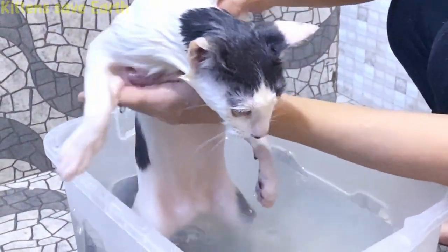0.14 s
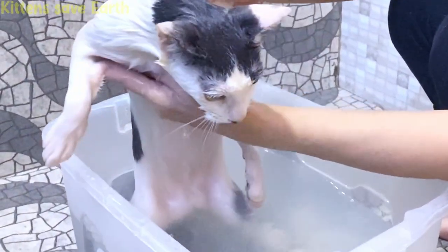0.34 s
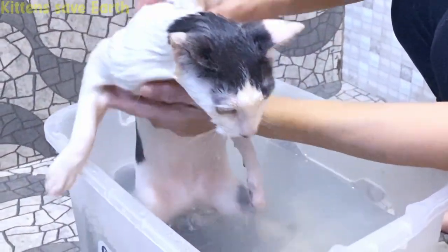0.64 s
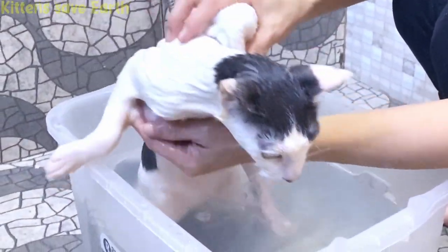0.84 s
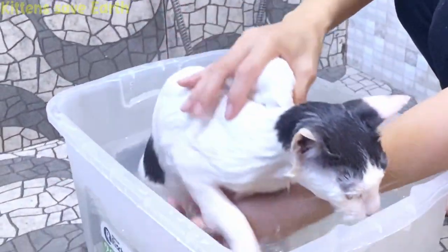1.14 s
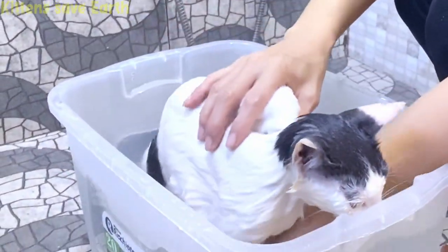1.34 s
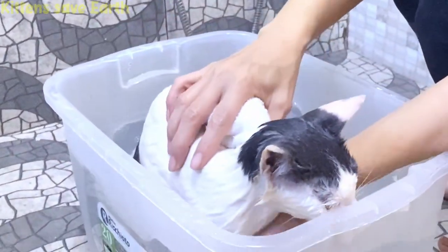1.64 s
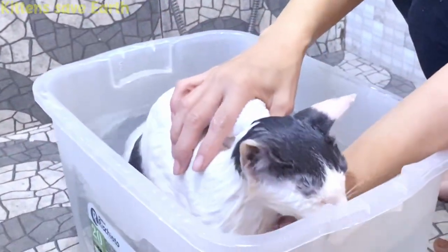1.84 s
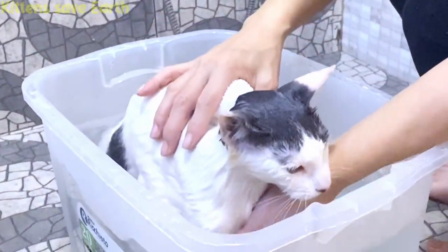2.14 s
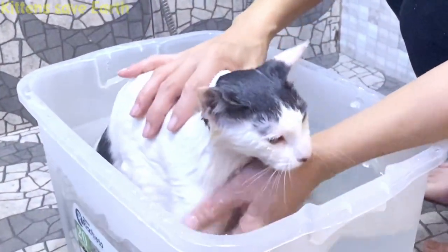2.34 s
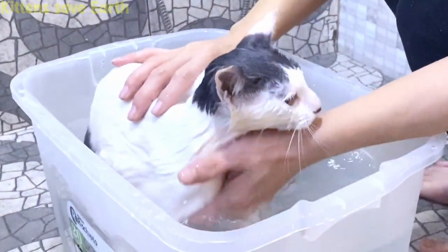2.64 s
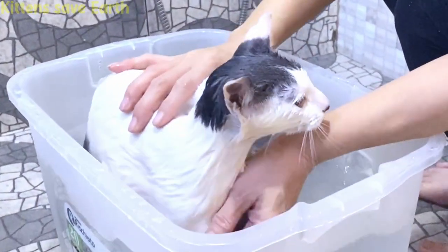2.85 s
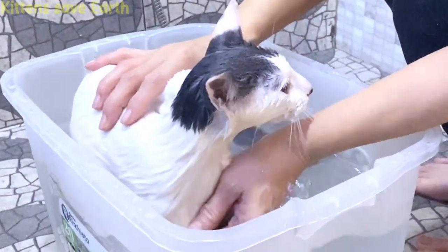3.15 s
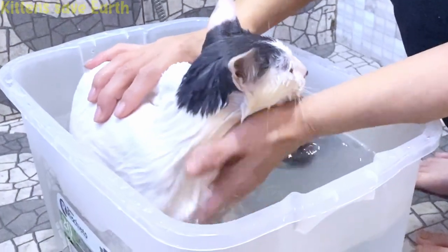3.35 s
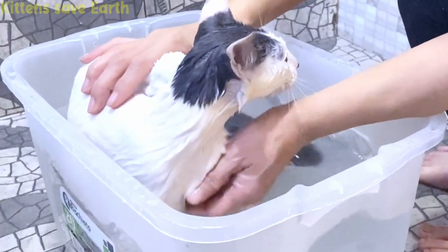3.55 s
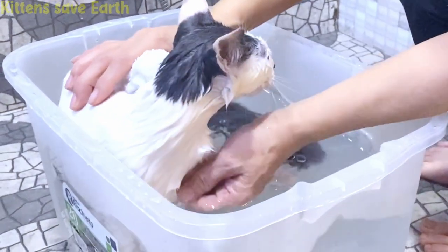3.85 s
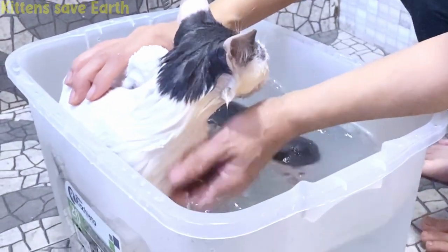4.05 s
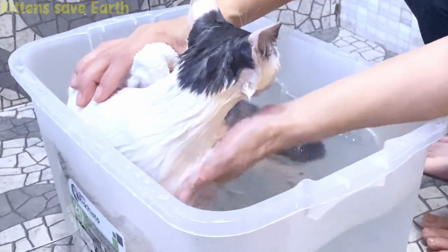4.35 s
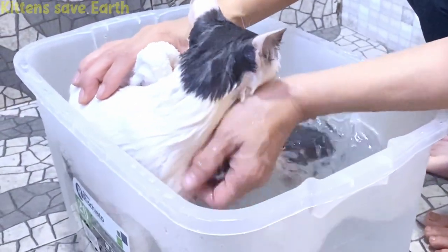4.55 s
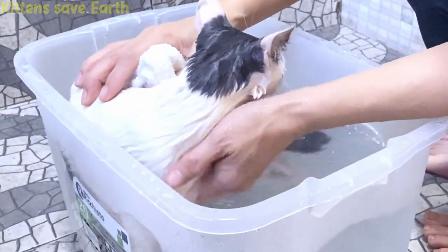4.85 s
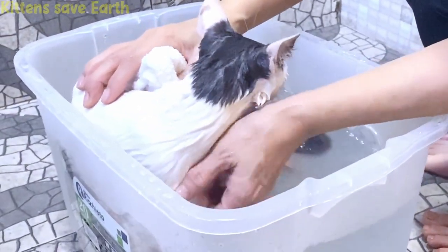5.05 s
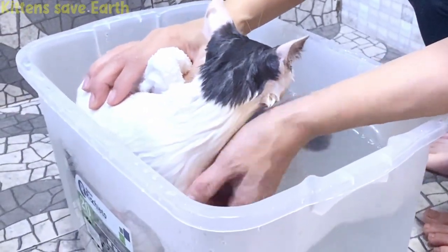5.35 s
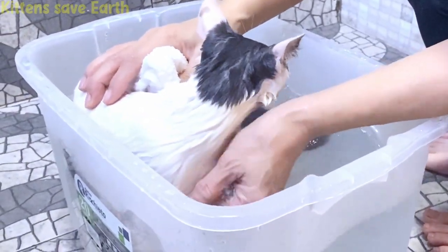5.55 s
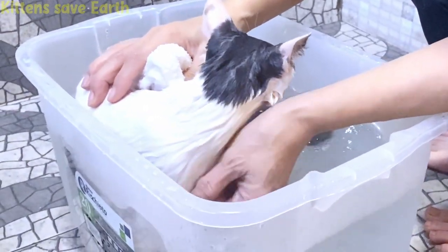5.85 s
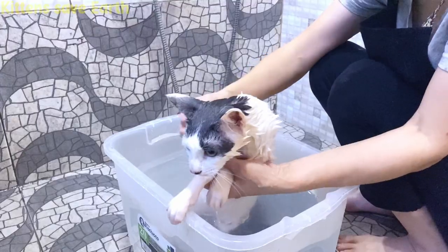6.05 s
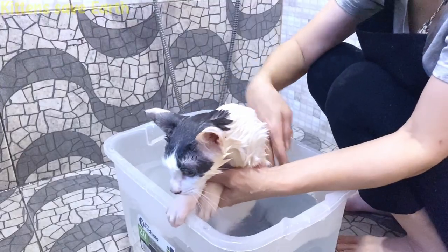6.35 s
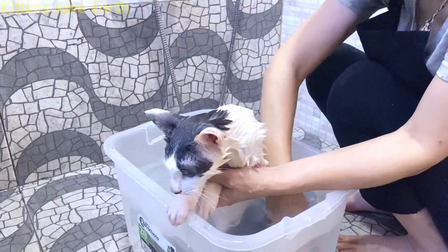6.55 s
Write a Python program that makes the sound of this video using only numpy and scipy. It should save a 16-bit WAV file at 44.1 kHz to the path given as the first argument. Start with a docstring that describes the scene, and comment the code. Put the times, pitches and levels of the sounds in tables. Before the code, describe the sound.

Water sloshes, fizzes and slaps in a plastic tub as hands wash a wet cat; hard tiles ring, then an abrupt cut to near quiet.

```python
"""Drips plink into a plastic tub of water, then a cat is lowered in and washed by hand in a small tiled room.
Each stroke of the hand frees swarms of bubbles that fizz and gurgle, and shoves the tub's rumbling walls.
Scooped water slaps the surface as bursts of noise, spray spatters in tiny ticks, wet films crackle.
A stereo pair hears it with the ring of the hard walls, over a faint steady hush. Near the end the sound
cuts abruptly, echoes included, to a later moment with a few drips and a hand dipping in."""
import sys
import numpy as np
from scipy import signal
from scipy.fft import rfft, irfft, next_fast_len
from scipy.io import wavfile
from scipy.ndimage import uniform_filter1d

SR = 44100
rng = np.random.default_rng(int(sys.argv[2]) if len(sys.argv) > 2 else 0)


def file_out(sig):
    """Save sig as 16-bit WAV at sys.argv[1]."""
    # one column per channel
    cols = np.atleast_2d(sig).T
    # limit, then scale
    lim = np.clip(cols, -1, 1)
    pcm = np.round(lim * 32767).astype(np.int16)
    wavfile.write(sys.argv[1], SR, pcm)


N = 295205

# Strokes of the hand or the cat through the water. Each row: start in seconds, length in seconds,
# fizz pitch in Hz, fizz level in dB, gurgle pitch in Hz, gurgle level in dB, tub wall level in dB.
HAND_STROKES = [(1.294, 0.27, 2792, -38, 848, -37.5, -47.5), (1.554, 0.18, 3960, -41, 1584, -42.5, -54),
                (1.776, 0.23, 2725, -49.5, 1047, -49, -96), (2.015, 0.062, 3250, -46.5, 1020, -51, -89),
                (2.6, 0.06, 4000, -48, 720, -63.5, -90), (3.009, 0.07, 4170, -58, 1497, -53, -49.5),
                (3.281, 0.12, 1487, -35, 823, -47.5, -62), (3.648, 0.32, 3664, -72, 1328, -69, -78),
                (4.276, 0.14, 2426, -41.5, 897, -44.5, -51.5), (4.387, 0.2, 4760, -45.5, 1491, -52.5, -67),
                (4.564, 0.069, 2720, -33.5, 1640, -50, -60), (4.792, 0.14, 2190, -37.5, 682, -36, -49),
                (4.927, 0.26, 1908, -52, 885, -51.5, -71.5), (5.137, 0.12, 2624, -36.5, 880, -33.5, -52.5),
                (5.289, 0.28, 1958, -42, 644, -49, -58.5), (5.467, 0.16, 3740, -45.5, 710, -44, -54),
                (5.678, 0.1, 2283, -43, 1223, -45.5, -87), (5.754, 0.083, 4440, -49, 748, -43, -51),
                (6.558, 0.15, 2170, -63, 613, -56.5, -51.5)]
# The clearest air pockets trapped by the hand and the cat.
# Each row: start in seconds, pitch in Hz, level in dB, swell in seconds.
AIR_POCKETS = [(1.279, 3206, -25, .0018), (1.289, 1365, -30, 0.0061), (1.312, 1040, -31.5, 0.0049),
               (1.32, 3480, -28.5, 0.004), (1.355, 936, -20, 0.0018), (1.454, 2430, -22, 0.0017),
               (1.573, 2138, -26, 0.0033), (1.668, 1470, -35, 0.0015), (1.802, 1530, -34, 0.0056),
               (1.842, 833, -36, 0.0065), (1.861, 1475, -29.5, 0.0016), (1.88, 798, -33.5, 0.0057),
               (2.029, 2264, -28.5, 0.0021), (2.054, 2173, -30.5, 0.0033), (2.21, 783, -30.5, 0.0044),
               (2.226, 1264, -29, 0.00091), (2.607, 3340, -28, 0.0011), (3.013, 2188, -14, 0.0018),
               (3.019, 4010, -30, 0.0022), (3.288, 1458, -19, 0.0041), (3.312, 1586, -16, 0.0019),
               (3.33, 1103, -23, 0.0022), (4.251, 1470, -39, 0.0027), (4.261, 3000, -28, 0.00091),
               (4.28, 1505, -23, 0.0014), (4.284, 574, -28.5, 0.0065), (4.382, 715, -27, 0.0033),
               (4.576, 1970, -14.5, 0.0029), (4.789, 1086, -26, 0.0047), (4.83, 800, -22.5, 0.0034),
               (5.11, 2480, -18.5, 0.0012), (5.141, 1015, -18.5, 0.0033), (5.186, 1100, -22.5, .0018),
               (5.205, 806, -28, 0.0025), (5.317, 2360, -25, 0.0012), (5.419, 1500, -22.5, 0.00099),
               (5.738, 2585, -25.5, 0.0015), (5.787, 1005, -28, 0.002), (5.893, 614, -29.5, 0.0027),
               (5.937, 627, -40, 0.0024)]
# Drops falling from the wet fur and hands. Each row: start in seconds, pitch in Hz, level in dB.
FALLING_DRIPS = [(0.044, 2390, -52.5), (0.166, 3455, -41), (0.21, 5100, -50.5), (0.649, 1910, -45),
                 (0.662, 2000, -40.5), (0.922, 2685, -44.5), (0.927, 1270, -52.5), (0.992, 1743, -32.5),
                 (2.402, 6510, -41.5), (2.968, 2240, -35.5), (3.016, 5220, -38), (3.456, 5260, -34),
                 (3.56, 4060, -49.5), (3.66, 1304, -42), (3.735, 1385, -44), (3.817, 4110, -52),
                 (3.948, 1520, -45), (4.08, 1977, -42), (4.117, 4940, -48.5), (6.061, 3870, -50),
                 (6.222, 2116, -47.5), (6.252, 2600, -53.5), (6.362, 5380, -55.5)]
# Water slapping the surface, the fur or the tub wall.
# Each row: start in seconds, level in dB, centre frequency in Hz.
WATER_SLAPS = [(0.478, -66, 690), (0.646, -57.5, 3400.0), (1.273, -33, 3150), (1.886, -30.5, 2800),
               (2.054, -33.5, 3270), (2.229, -33.5, 3400), (2.605, -32, 3860), (3.014, -29, 2024),
               (3.287, -28.5, 1705), (3.312, -23.5, 3670), (4.278, -24, 2457), (4.377, -21.5, 5090),
               (4.574, -22.5, 5400), (4.787, -19, 2283), (5.317, -27.5, 2410), (6.534, -49, 5190)]
# Spray pattering on the water and the tub's rim.
# Each row: start in seconds, length in seconds, pitch in Hz, level in dB.
SPRAY_SPATTERS = [(1.118, .24, 5200, -57), (1.304, 0.18, 8940, -55.5), (1.573, .14, 8470, -50.5),
                  (2.601, 0.049, 7480, -43), (4.038, .2, 8020, -58), (5.136, .2, 4820, -53.5),
                  (5.43, 0.13, 8300, -54), (5.748, .06, 6370, -45.5)]
# Spectrum of the plastic walls' rumble. Each row: frequency in Hz, relative density in dB per Hz.
TUB_SPECTRUM = [(30, -24), (90, -3.5), (170, 1), (330, -2.5), (1200, -48.5)]
# How long the tiled room rings. Each row: frequency in Hz, time to fall by 60 dB in seconds.
TILE_RING = [(600, 0.64), (4000, 0.62), (9000, 0.48), (15000, 0.08)]
# Standing waves between the hard walls. One column: frequency in Hz.
STANDING_WAVES_HZ = [317, 525, 940, 1020, 1504, 1554]
# Response of the microphones to the water. Each row: frequency in Hz, gain in dB.
MICROPHONE_RESPONSE = [(50, -29), (300, -10.5), (600, -1.9), (6800, -4), (8400, -9.5), (10500, -4.5),
                       (13000, -9), (15000, -3)]
# Spectrum of the quiet room. Each row: frequency in Hz, relative density in dB per Hz.
AIR_SPECTRUM = [(30, -23), (65, -8), (330, -7.5), (700, -16), (2500, -23.5), (15000, -43.5)]

CUT_S, TOP_HZ = 5.968, 15750  # the cut to a later moment; upper band limit
SPOTS = 5  # places in the tub, each with its own paths to the microphones

# how far the strongest bubbles of a swarm stand out, and the foam around them
FIZZ_WIDTH_OCT, FIZZ_SPREAD_DB, FIZZ_FOAM_DB = 0.8, 19, -16
GURGLE_WIDTH_OCT, GURGLE_SPREAD_DB, GURGLE_FOAM_DB = 0.52, 13, -18
SPATTER_WIDTH_OCT, SPATTER_SPREAD_DB, SPATTER_MIST_DB = 0.7, 24, -15
# the gurgle comes once the hand is in deep, the shove reaches the walls late (shares of the stroke)
GURGLE_LAG, WALL_LAG = 0.26, 0.23
# a drip or a pocket breaks into a short run of bubbles: gap, loss at each step, scatter either way
RUN_GAP_S, RUN_LOSS_DB, RUN_SCATTER_OCT = 0.022, 12.5, 0.34
DRIP_SWELL_S = 0.0016
# flung drops: longest flight, level over the fizz, middle pitch, scatter either way; late ones are fainter
FLIGHT_S, DROP_DB, DROP_HZ, DROP_OCT = 0.21, 1, 3895, 0.95
DROP_FADE_DB_PER_S = 72
# swell of a slap at 0 dB; it doubles for every so many dB softer
SLAP_WIDTH_OCT, SLAP_SWELL_S, SLAP_SLOWING_DB = 0.62, 0.00075, 22
SPRAY_DB, SPRAY_S = -20, 0.015  # the spray of a slap: level against the slap, slower swell
STANDING_DB, STANDING_T60_S = -24, 0.5


def surges():
    """List the swarms of every stroke: it first churns up fizz, then a low gurgle."""
    for s, length, fizz_hz, fizz_db, gurgle_hz, gurgle_db, _ in HAND_STROKES:
        yield s, length, fizz_db, fizz_hz, FIZZ_WIDTH_OCT, FIZZ_SPREAD_DB, FIZZ_FOAM_DB
        late = s + GURGLE_LAG * length
        gurgle_length = length * (1 - GURGLE_LAG / 2)
        yield (late, gurgle_length, gurgle_db, gurgle_hz,
               GURGLE_WIDTH_OCT, GURGLE_SPREAD_DB, GURGLE_FOAM_DB)


def swarms(rows, density, sink, ring):
    """Each row frees bubbles in a little foam; they grow by sink octaves, and the large ones ring longest."""
    out, t = np.zeros((SPOTS, N)), np.arange(SR // 50) / SR
    for s, length, db, centre, width, spread_db, foam_db in rows:
        push = stroke(length)
        count = int(density * length * width * np.sqrt(centre)) + 2  # small bubbles come in greater numbers
        jitter, order, strength = rng.random((count, 3)).T
        when = (np.arange(count) + jitter) / count
        rank = np.argsort(order) / count  # all sizes, in any order
        offset = 2 * rank - 1
        hz = np.minimum(centre * 2 ** (1.43 * width * offset - sink * (when - .5)), TOP_HZ)
        # a few strong bubbles stand out, mostly of middling size
        gain = amp(spread_db * (strength ** 3 - offset ** 2 / 2))
        swell_s = ring / np.sqrt(hz[:, None])
        grains = gain[:, None] * bubble(t, hz[:, None], swell_s, chirp=0.047)
        index = (when * len(push)).astype(int)[:, None] + np.arange(len(t))
        swarm = unit(np.bincount(index.ravel(), grains.ravel(), len(push))[:len(push)])
        foam = amp(foam_db) * hiss(len(push), centre, width, skirt_db=-20)
        add(anywhere(out), s, amp(db) * push * unit(swarm + foam))
    return out


def stroke(length):
    """The strength of one push: a quick rise and a slower release."""
    return np.sin(np.pi * np.linspace(0, 1, int(length * SR)) ** .5).clip(0) ** 0.35


def bubble(t, hz, swell_s, chirp):
    """A pinched-off bubble swells and rings out; its pitch climbs as it nears the surface."""
    glide = 1 + chirp * (np.minimum(t / swell_s, 10) / 2 - 1)
    return burst(t, swell_s) * np.sin(2 * np.pi * hz * t * glide)


def pinch_offs():
    """List single bubbles: short runs from drips and air pockets, and flung drops falling back."""
    drips = [(*drip, DRIP_SWELL_S) for drip in FALLING_DRIPS]
    for s, hz, db, swell_s in drips + list(AIR_POCKETS):
        yield s, hz, db, swell_s
        for k, (late, off) in enumerate(rng.uniform(-1, 1, size=(2, 2)), 1):
            start = s + RUN_GAP_S * (k + late / 2)
            yield start, hz * 2 ** (RUN_SCATTER_OCT * off), db - RUN_LOSS_DB * k, swell_s
    for s, length, _, fizz_db, *_ in HAND_STROKES:
        for late, off in rng.random(size=(5, 2)):
            flight = FLIGHT_S * late
            hz = DROP_HZ * 2 ** (DROP_OCT * (2 * off - 1))
            yield s + flight, hz, fizz_db + DROP_DB - DROP_FADE_DB_PER_S * flight, DRIP_SWELL_S


def plinks():
    """The single bubbles, each begun by the wet tick of the surface closing."""
    out, t = np.zeros((SPOTS, N)), np.arange(SR // 16) / SR
    tick_shape = (1 - np.exp(-t / 0.00072)) * np.exp(-t / 0.0011)
    for s, hz, db, swell_s in pinch_offs():
        tick = amp(-14) * tick_shape * hiss(len(t), 1.6 * hz, width=0.3, skirt_db=-28)
        add(anywhere(out), s, amp(db) * (bubble(t, hz, swell_s, chirp=0.031) + tick))
    return out


def slaps():
    """Each slap is a short spitting burst and a softer spray; the louder the slap, the more sudden it is."""
    out, t = np.zeros((SPOTS, N)), np.arange(SR // 10) / SR
    for s, db, centre in WATER_SLAPS:
        contact = burst(t, SLAP_SWELL_S * 2 ** (-db / SLAP_SLOWING_DB))
        spray = amp(SPRAY_DB) * burst(t, SPRAY_S)
        noise = hiss(len(t), centre, SLAP_WIDTH_OCT, skirt_db=-16.5)
        add(anywhere(out), s, amp(db) * (contact + spray) * noise)
    return out


def spatter():
    """Tiny droplets land as crisp ticks, too small to ring."""
    rows = [(s, length, db, hz, SPATTER_WIDTH_OCT, SPATTER_SPREAD_DB, SPATTER_MIST_DB)
            for s, length, hz, db in SPRAY_SPATTERS]
    return swarms(rows, density=7, sink=0, ring=.014)


def tub():
    """The plastic walls answer each stroke with a dull, low rumble."""
    force = np.zeros(N)
    for s, length, *_, db in HAND_STROKES:
        add(force, s + WALL_LAG * length, amp(db) * stroke(length))
    return force * coloured(rng.standard_normal(N), TUB_SPECTRUM)


def crackle(water, idle_db, spray_db):
    """Tiny films of water snap on wet fur all the time; churning makes them harder."""
    out, t = np.zeros((SPOTS, N)), np.arange(SR // 100) / SR
    steepness = np.gradient(water.sum(0))  # fast, small bubbles spray most
    churn = np.sqrt(np.abs(uniform_filter1d(steepness ** 2, size=2000)))
    for when, size, strength in rng.random(size=(420, 3)):
        hardness = amp(idle_db) + amp(spray_db) * churn[int(when * N)]
        gain = hardness * amp(20 * (strength ** 4 - 1))
        snap = np.exp(-t / .0008) * hiss(len(t), 4500 * 2.7 ** size, width=.3, skirt_db=-30)
        add(anywhere(out), when * N / SR, gain * snap)
    return out


def room(wet_db, early_db, lead_s, left_db):
    """Stereo response: the direct path, a few bounces off the tub's walls, then the ring of the tiles."""
    hz, t, z = signal.stft(rng.standard_normal((2, SR * 2 // 3)), SR, nperseg=256)
    decay = amp(-60 * t / along(TILE_RING, hz)[:, None])
    onset = 1 - np.exp(-t / .004)
    tail = signal.istft(z * decay * onset, SR, nperseg=256)[1]
    response = amp(wet_db) * tail / np.linalg.norm(tail, axis=1, keepdims=True)
    t = np.arange(response.shape[1]) / SR
    fade = amp(-60 * t / STANDING_T60_S)
    waves = np.exp(2j * np.pi * np.outer(STANDING_WAVES_HZ, t)) * fade * np.sqrt(2) / np.linalg.norm(fade)
    for ear in response:
        phases = np.exp(2j * np.pi * rng.random(len(waves)))
        ear += amp(STANDING_DB) * (phases @ waves).real
        bounces = rng.uniform(.001, .022, size=8)  # delays in seconds
        ear[(bounces * SR).astype(int)] += amp(early_db) * rng.choice([-1, 1], size=8)
    # the direct sound reaches the left first and a little louder
    response[0, 0] += amp(left_db)
    response[1, round(lead_s * SR)] += amp(-left_db)
    return response


def room_air():
    """The faint steady hush of the room, mostly bass, partly common to both microphones."""
    shared = coloured(rng.standard_normal(N), AIR_SPECTRUM)
    apart = coloured(rng.standard_normal((2, N)), AIR_SPECTRUM)
    return amp(-77.5) * shared + amp(-76.0) * apart


def amp(db):
    """Decibels to gain."""
    return 10 ** (np.asarray(db) / 20)


def unit(x):
    """x at rms 1."""
    return x / np.sqrt(np.mean(x ** 2) + 1e-20)


def along(points, hz):
    """(Hz, value) points read on a log axis."""
    f, v = np.transpose(points)
    return np.interp(np.log(hz + 1), np.log(f), v)


def filtered(x, response):
    """x times a response of frequency."""
    n = x.shape[-1]
    m = next_fast_len(n + 4096)
    return irfft(rfft(x, m) * response(np.fft.rfftfreq(m, 1 / SR)), m)[..., :n]


def coloured(x, spectrum):
    """x shaped by a spectrum, at rms 1."""
    return unit(filtered(x, lambda hz: amp(along(spectrum, hz))))


def hiss(length, centre, width, skirt_db):
    """Noise of rms 1 around a centre pitch, on a broad skirt."""
    def band(hz):
        peak = np.exp(-(np.log2((hz + 1) / centre) / width) ** 2 / 2)
        return peak + amp(skirt_db) / (1 + (hz / centre) ** 2)
    return unit(filtered(rng.standard_normal(length), band))


def burst(t, swell_s):
    """An envelope that peaks at 1 after swell_s and dies away."""
    return t / swell_s * np.exp(1 - t / swell_s)


def anywhere(spots):
    """The track of a random place in the tub."""
    return spots[rng.integers(SPOTS)]


def add(track, s, sound):
    """Mix a sound into the track at time s."""
    part = track[max(round(s * SR), 0):][:len(sound)]
    part += sound[:len(part)]


def scene():
    """The water in its room, cut to a later moment near the end; no echo carries over the cut."""
    rumble = tub()
    sloshing = swarms(surges(), density=12, sink=.38, ring=.062)
    water = plinks() + slaps() + sloshing + spatter() + crackle(sloshing, idle_db=-54, spray_db=20)
    water[0] += amp(-3.0) * rumble
    water = filtered(water, lambda hz: amp(along(MICROPHONE_RESPONSE, hz)))
    before = uniform_filter1d(1. * (np.arange(N) < CUT_S * SR), size=300)
    heard = np.zeros((2, N))
    for spot in water:
        response = room(wet_db=-1.7, early_db=-10, lead_s=.00005, left_db=1.1)
        for part in (before, 1 - before):
            echoed = signal.fftconvolve((spot * part)[None], response, axes=1)[:, :N]
            heard += part * echoed
    balanced = heard * amp([[.7], [-.7]])  # left a little louder
    # the long waves of the tub reach both ears alike
    return balanced + amp(-15.0) * rumble + room_air()


def record(dry):
    """Nothing is kept above the band limit."""
    return filtered(dry, lambda hz: hz < TOP_HZ)


dry = scene()
out = record(dry)
file_out(out)
```